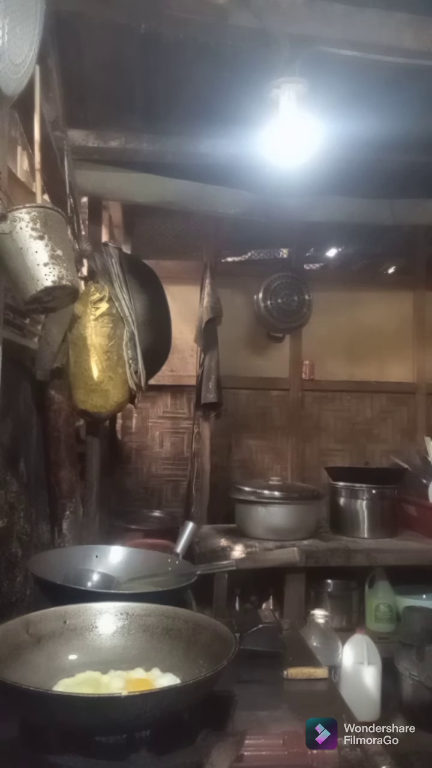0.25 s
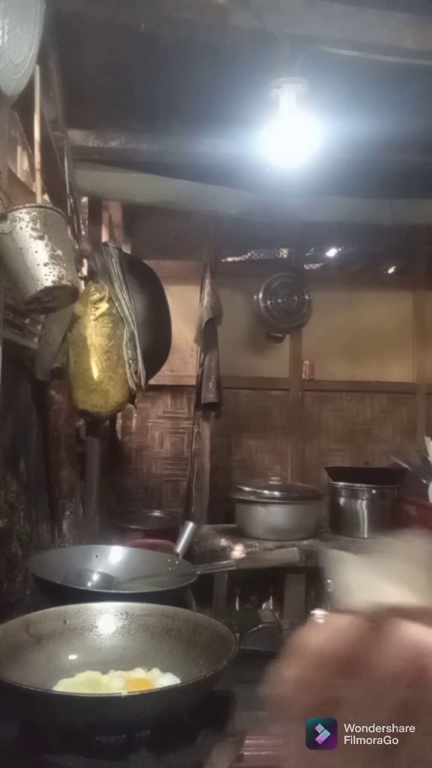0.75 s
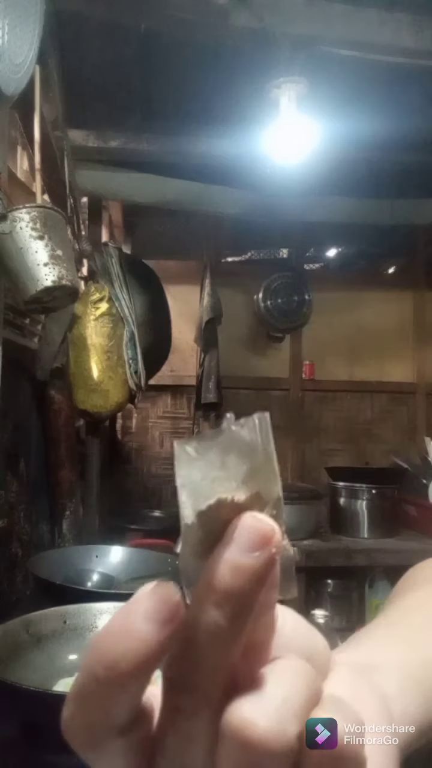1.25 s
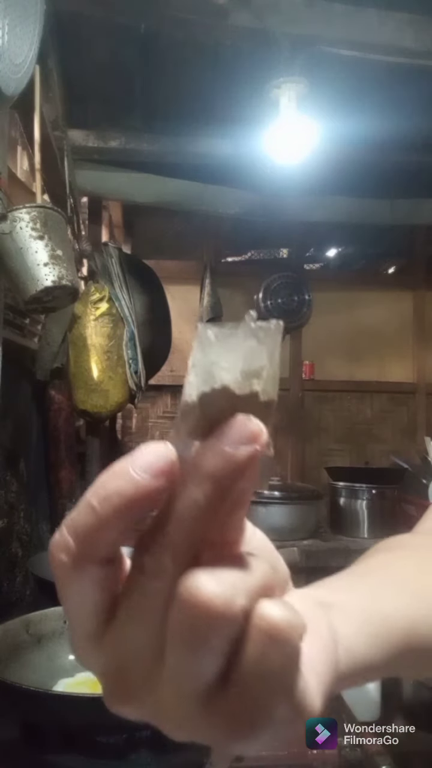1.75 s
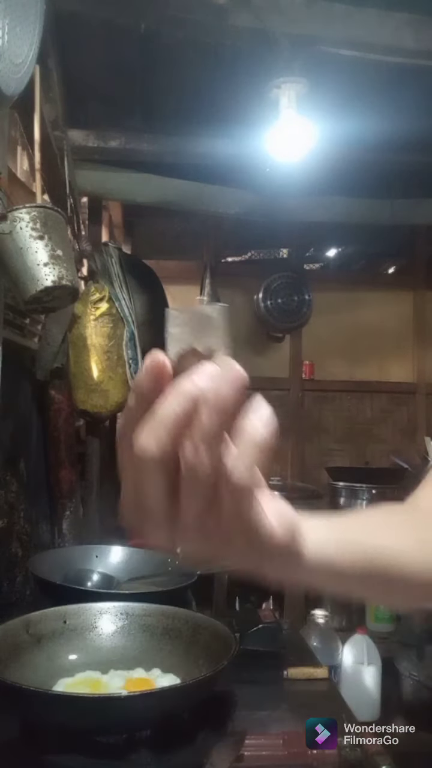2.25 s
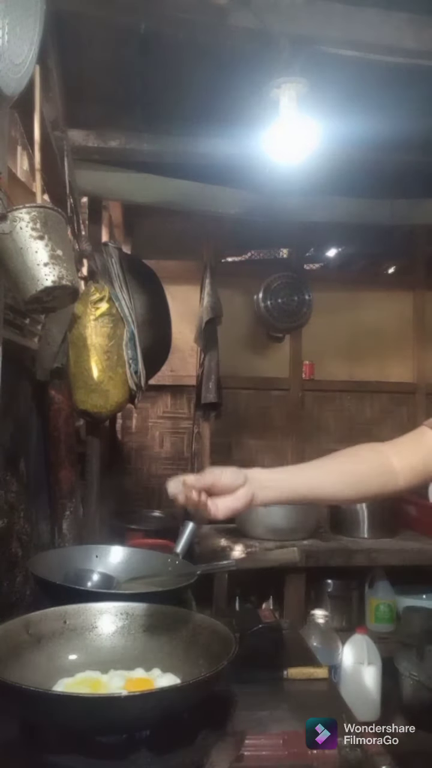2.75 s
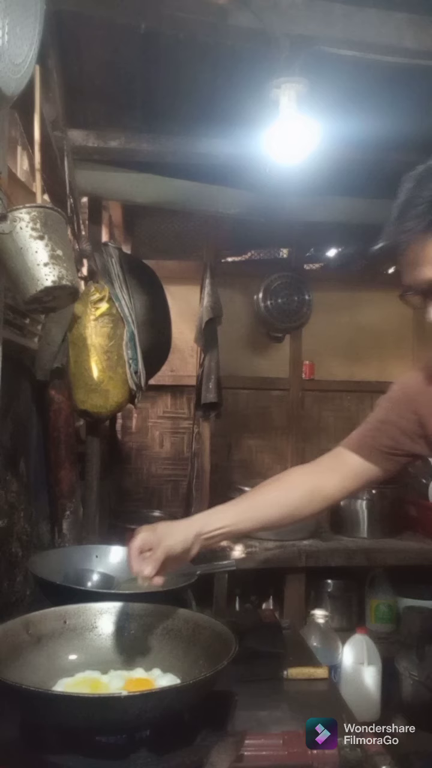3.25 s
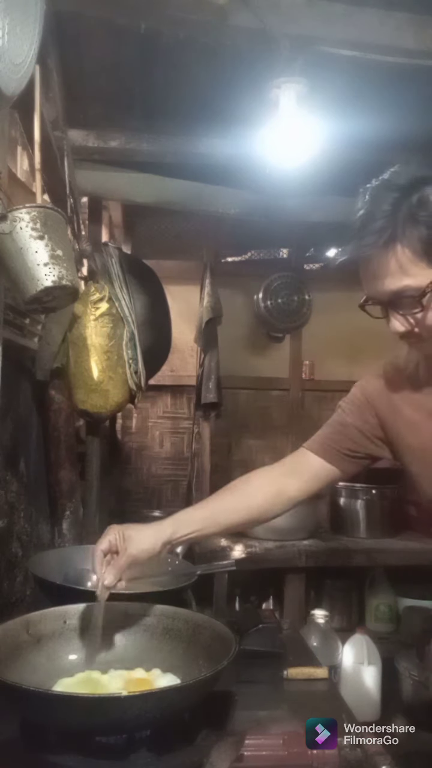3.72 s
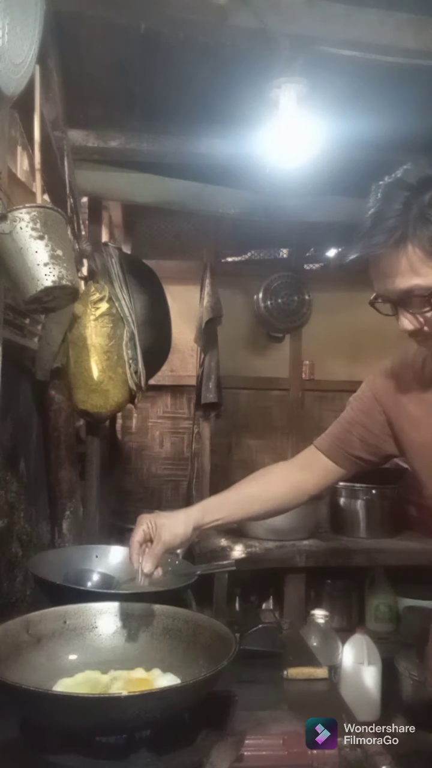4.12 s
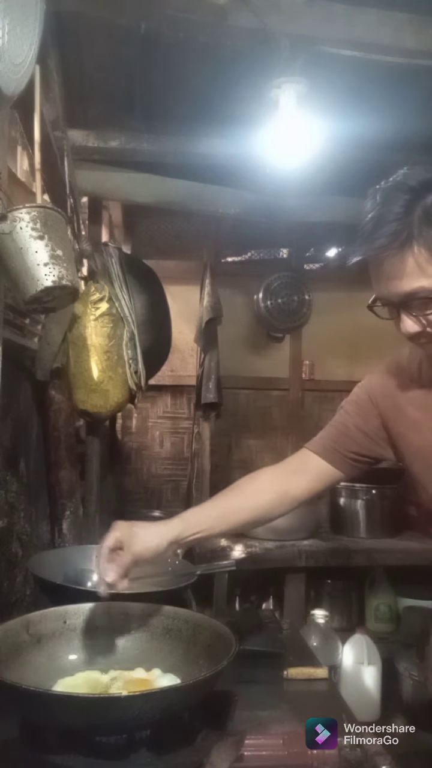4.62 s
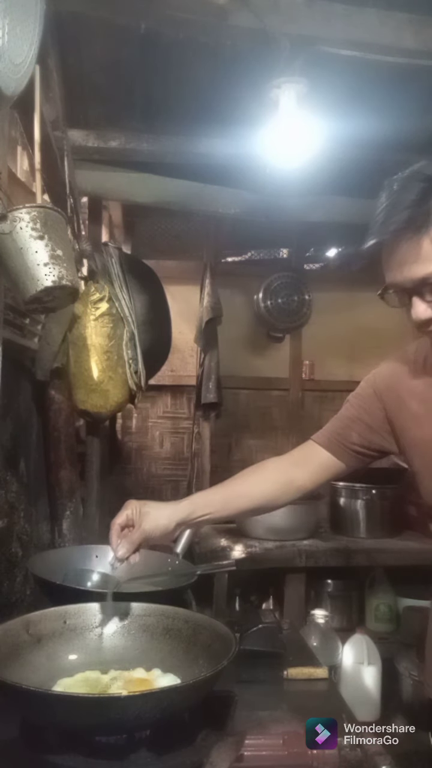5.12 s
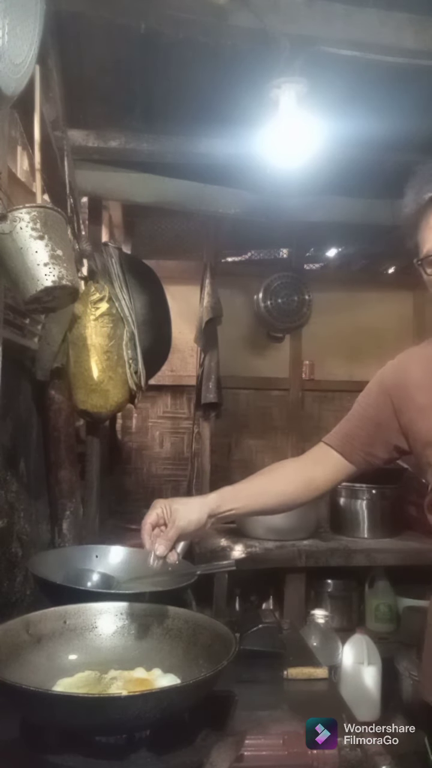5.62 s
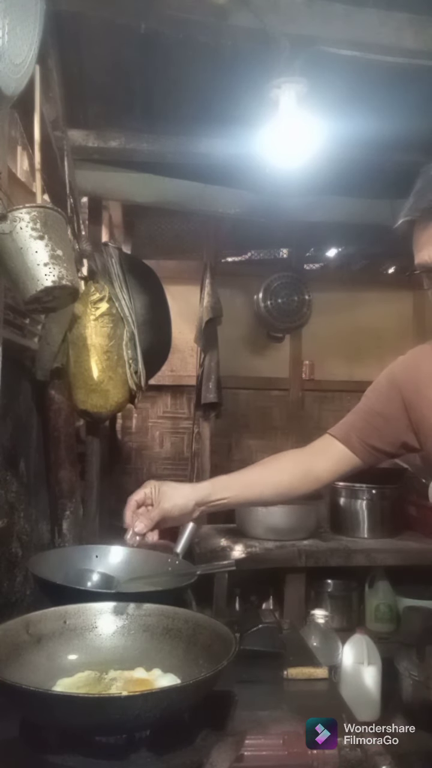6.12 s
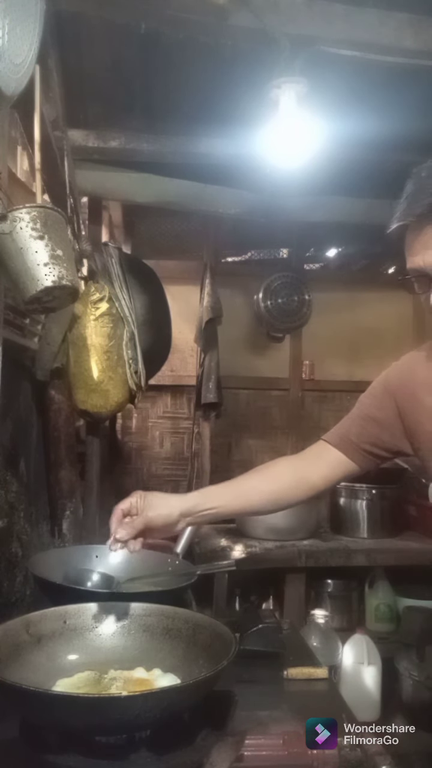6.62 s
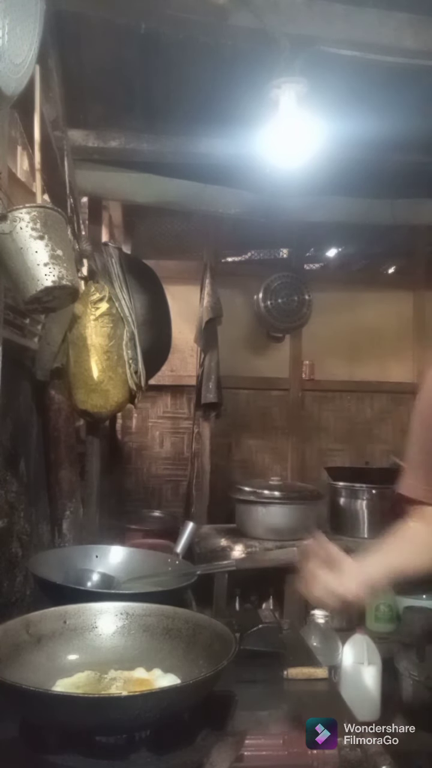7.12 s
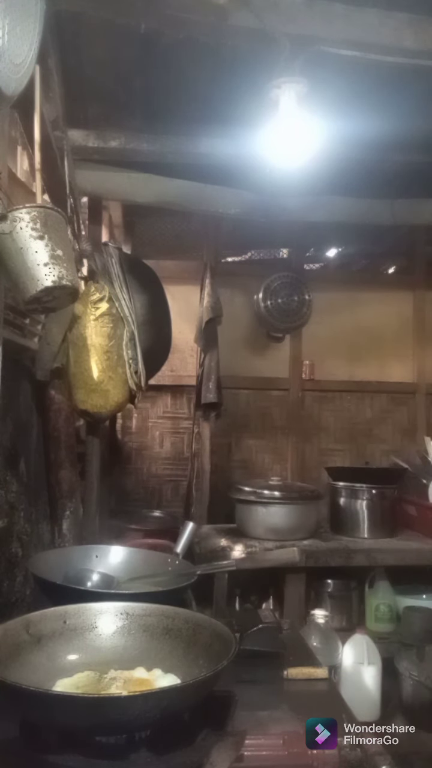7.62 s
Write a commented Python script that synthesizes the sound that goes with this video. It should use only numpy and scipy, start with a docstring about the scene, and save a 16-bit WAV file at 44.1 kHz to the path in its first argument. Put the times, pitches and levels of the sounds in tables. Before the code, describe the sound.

Steady frying with crackling bubbles, one sharp oil spit, soft rustles and knocks, over the low boom of a motorbike and passing vehicle outdoors.

```python
"""Eggs frying beside a street

Eggs fry in a steel wok: random clicks make the sizzle, short ringing noise bands the bubbles and a loud spit of oil.
A pinch of seasoning lifts the fine spray. A sleeve rustles with friction grains and hollow knocks ring.
Outside, a single-cylinder motorbike pulls three times and coasts in between, its boom muffled by the wall.
A second vehicle passes at a steady speed with Doppler shift, over coloured noise and faint falling whines.
"""
import sys
import numpy as np
from scipy import signal
from scipy.fft import rfft, irfft
from scipy.io import wavfile
from scipy.ndimage import uniform_filter1d

SR = 44100
rng = np.random.default_rng(int(sys.argv[2]) if len(sys.argv) > 2 else 0)


def materialize(psi):
    """Save the field psi as 16-bit PCM at rate SR to the path in sys.argv[1].

    A 1-D psi becomes a single channel; in a 2-D psi each row is a channel.
    """
    bounded = np.clip(np.atleast_2d(psi).T, -1, 1)
    quanta = np.round(bounded * 32767).astype(np.int16)
    wavfile.write(sys.argv[1], SR, quanta)


N = 347067
T = np.arange(N) / SR  # time [s]

# modes of the steel wok: (frequency [Hz], bandwidth [Hz], relative gain [dB])
WOK_MODES = [(805, 20, -7), (901, 20, -2), (955, 25, -3), (1199, 40, -4), (1414, 30, -6), (1576, 22, 0),
             (1695, 30, -7), (1954, 30, -4), (2065, 24, -2), (2210, 40, -9), (2448, 16, -3), (2583, 30, -6),
             (2690, 30, -9), (2805, 16, -5), (3227, 25, -2), (3363, 40, -10), (3850, 50, -11),
             (4000, 30, -3), (4163, 30, -1.5), (4400, 45, -10), (4980, 35, -8), (5152, 35, -7),
             (5480, 35, -8), (6120, 35, -6)]
# reverberation of the kitchen: (frequency [Hz], time to fall 60 dB [s])
KITCHEN_T60 = [(300, 0.8), (1500, 0.11), (4000, 0.21), (10000, 0.23)]


def gain_of(db):
    """Decibels to amplitude ratio."""
    return 10 ** (np.asarray(db) / 20)


def unit_rms(x):
    """Normalises the mean power to 1."""
    return x / np.sqrt(np.mean(x ** 2) + 1e-20)


def spectrum_at(points, hz):
    """Spectral interpolation: straight lines over log frequency."""
    f, value = np.transpose(points)
    return np.interp(np.log(hz + 1), np.log(f + 1), value)


def follow(rows, t):
    """Linear interpolation in time: the columns of a curve table at the times t."""
    s, *columns = np.transpose(rows)
    return [np.interp(t, s, c) for c in columns]


def add(mix, s, sound):
    """Superposition: adds a sound to the mix from time s, cut off at the end of the mix."""
    part = mix[max(round(s * SR), 0):][:len(sound)]
    part += sound[:len(part)]


def colour(x, points):
    """Zero-phase spectral shaping: filters x by the curve of the points, to rms 1."""
    gain = gain_of(spectrum_at(points, np.fft.rfftfreq(N, 1 / SR)))
    return unit_rms(irfft(rfft(x) * gain, N))


def wander(rate_hz, size=64):
    """Slow random fluctuation: low-passed noise of rms 1, computed at every size-th sample."""
    t = T[::size]
    lowpass = signal.butter(3, min(rate_hz, 200), fs=SR / size, output="sos")
    smooth = signal.sosfilt(lowpass, rng.standard_normal(2 * len(t)))
    settled = smooth[len(t):]
    return np.interp(T, t, unit_rms(settled))


def swell(peak_s, rise_s, fall_s):
    """Gaussian envelope: a smooth rise to 1 and a smooth fall."""
    return np.exp(-((T - peak_s) / np.where(T < peak_s, rise_s, fall_s)) ** 2)


def held(from_s, to_s, attack_s, release_s):
    """Trapezoidal envelope: linear attack, hold at 1, linear release after to_s."""
    attack = (T - from_s) / attack_s
    release = 1 - (T - to_s) / release_s
    return np.clip(np.minimum(attack, release), 0, 1)


def ring(x, modes, ring_db):
    """Modal resonance: parallel resonators driven by x sound along with it."""
    out = x
    for hz, width, db in modes:
        mode = signal.iirpeak(hz, hz / width, SR)
        out = out + gain_of(db + ring_db) * signal.lfilter(*mode, x)
    return out


def crackle(per_s, spread_db):
    """Random impulse train: exponential dB offsets make a few clicks louder (spread > 0) or softer (< 0)."""
    size = gain_of(spread_db * np.minimum(rng.exponential(1, N), 5))
    return rng.choice([-1, 1], N) * size * (rng.random(N) < per_s / SR)


def burst(hz, octaves, decay_s, room_db, snap=5, size=8192):
    """Impulsive excitation of a minimum-phase band, then reverberant decay.

    The direct part has the energy of 20 ms at rms 1; so has the tail before room_db."""
    t, f = T[:size], np.maximum(abs(np.fft.fftfreq(size, 1 / SR)), 1)
    log_gain = -np.minimum((np.log2(f / hz) / max(octaves, .05)) ** 2 / 4, 8)
    # the Hilbert transform of the log gain gives the minimum phase
    band = np.exp(np.conj(signal.hilbert(log_gain)))[:size // 2 + 1]
    puff, echoes = rng.standard_normal((2, size))
    puff = puff * np.exp(-t / decay_s) + snap * (t == 0)
    echoes = echoes * gain_of(-60 * t / spectrum_at(KITCHEN_T60, hz)) * (t > .003)
    direct = unit_rms(irfft(rfft(puff) * band))
    tail = unit_rms(irfft(rfft(echoes) * band))
    return (direct + gain_of(room_db) * tail) * np.sqrt(.02 * SR / size)


def bursts(rows, decay_s, room_db):
    """Superposition of bursts, one for each row (time [s], level [dB], centre [Hz], spread [octaves])."""
    out = np.zeros(N)
    for s, db, hz, octaves in rows:
        add(out, s, gain_of(db) * burst(hz, octaves, decay_s, room_db))
    return out


def sizzle():
    """Shot noise: thousands of tiny steam bubbles a second, and a finer spray that grows under the seasoning."""
    # strength of the frying before the wok rings: (time [s], level [dB])
    frying_level = [(0, -46.5), (1.5, -50), (2.3, -47.5), (4.1, -46), (5.5, -45), (6.2, -50), (6.65, -46.5),
                    (7.87, -48.5)]
    # spectrum of the bubbles: (frequency [Hz], relative level per Hz [dB])
    body_spectrum = [(600, -27.5), (1000, 2), (1200, 2.5), (1500, -1), (2000, -1), (2800, -1), (3300, -2.5),
                     (4300, -10.5), (5300, -16.5), (6800, -20), (8500, -42.5), (10000, -40.5), (15500, -51)]
    # spectrum of the spray: (frequency [Hz], relative level per Hz [dB])
    spray_spectrum = [(3000, -15), (5500, -8), (7500, -5.5), (8500, 2.5), (9300, -10.5), (10300, -19),
                      (12500, -30.5), (15500, -24)]
    spray_db, seasoning_lift_db = -71, 6.5
    seasoning = held(from_s=4.67, to_s=5.55, attack_s=0.28, release_s=0.28)
    body_db = follow(frying_level, T)[0] + .5 * wander(rate_hz=6.5)
    body = colour(crackle(per_s=6000, spread_db=-1.5), body_spectrum) * gain_of(body_db)
    spray_db = spray_db + seasoning_lift_db * seasoning + 0.91 * wander(rate_hz=36)
    spray = colour(crackle(per_s=6700, spread_db=1.0), spray_spectrum) * gain_of(spray_db)
    return body + spray


def small_bubbles(count=280):
    """Bubble resonance: faint pitched ticks, higher and softer the smaller the bubble, a few of them stronger."""
    lowest_hz, range_octaves, spread_octaves = 2130, 1.9, .11
    lowest_db, db_per_octave, luck_db = -53, -7.3, 3.5
    when, pitch, luck, width = rng.random((count, 4)).T
    octave = range_octaves * pitch ** 0.626
    db = lowest_db + db_per_octave * octave + luck_db * luck ** 3
    rows = zip(when * N / SR, db, lowest_hz * 2 ** octave, spread_octaves * (.5 + width))
    return bursts(rows, decay_s=0.003, room_db=1.5)


def big_bubbles():
    """Impulsive radiation: each of the biggest bubbles bursts with a short band of noise."""
    # before the wok rings: (time [s], level [dB], centre [Hz], spread [octaves])
    pops = [(0.029, -52, 5070, 0.19), (0.153, -42.5, 2680, 0.21), (0.18, -49, 4150, .05),
            (0.27, -45.5, 2020, .2), (0.332, -56, 6000, 0.19), (0.349, -47, 2630, 0.2),
            (0.37, -47, 5660, 0.12), (0.41, -51.5, 3080, 0.06), (0.505, -59, 6200, 0.11),
            (0.523, -46, 2670, 0.17), (0.537, -52, 4960, .08), (0.676, -50, 5160, .09),
            (1.101, -47, 4100, .07), (1.154, -49, 2160, .12), (1.204, -62, 7750, 0.12),
            (1.293, -48.5, 4570, 0.13), (1.355, -58, 5200, .07), (1.418, -61, 6200, 0.097),
            (1.431, -48.5, 3280, 0.18), (1.455, -56, 5900, 0.11), (1.509, -60, 7400, 0.12),
            (1.538, -55, 5200, 0.064), (1.682, -50, 2780, .15), (1.686, -56.5, 5160, 0.15),
            (1.805, -58, 3520, 0.055), (1.908, -55.5, 6700, .075), (2.061, -61, 6740, 0.087),
            (2.081, -56, 5770, .08), (2.153, -45, 2850, 0.46), (2.186, -46.5, 3040, 0.16),
            (2.225, -52, 4030, 0.089), (2.316, -47, 3150, 0.4), (2.645, -60, 5200, .08),
            (2.677, -56, 4500, .08), (2.893, -46.5, 4720, 0.1), (3.205, -45, 3100, .12),
            (3.323, -53, 5770, 0.13), (3.367, -56, 5460, .1), (3.494, -61, 6250, .09),
            (3.544, -57, 4860, .08), (3.599, -62, 8600, .08), (3.788, -57, 6500, .075),
            (3.815, -52, 3800, 0.052), (3.817, -59, 6750, .07), (3.844, -51, 3870, 0.088),
            (3.944, -56, 5430, .07), (4.034, -49, 5150, .15), (4.062, -42, 2680, 0.23),
            (4.083, -49.5, 4600, .15), (4.144, -55, 5570, .11), (4.222, -73, 12500, .25),
            (4.268, -48.5, 5030, 0.11), (4.327, -42, 3060, 0.11), (4.38, -62, 6150, .08),
            (4.574, -43, 2280, 0.31), (4.724, -39.5, 2640, 0.12), (4.864, -55, 5340, .08),
            (4.907, -44.5, 4000, 0.1), (5.24, -62, 7500, 0.082), (5.342, -46.5, 2470, 0.038),
            (5.565, -53, 6900, 0.14), (5.665, -52.5, 4100, 0.11), (5.707, -52.5, 5250, 0.06),
            (5.756, -49.5, 3980, 0.11), (5.799, -45.5, 2040, 0.22), (5.938, -60, 6950, .12),
            (5.95, -48.5, 3160, 0.15), (5.991, -55.5, 6360, 0.11), (6.181, -53, 3400, .08),
            (6.36, -47, 3000, 0.1), (6.382, -60.5, 6100, .08), (6.469, -59, 5370, 0.061),
            (6.497, -59, 7150, 0.1), (6.512, -62, 8300, .08), (6.581, -55.5, 5600, .17),
            (6.642, -46.5, 3450, .09), (6.644, -53, 4860, 0.09), (6.673, -49, 4700, 0.15),
            (6.803, -40, 3270, .095), (6.831, -50, 4440, 0.21), (6.873, -60, 6200, 0.091),
            (6.978, -58, 4930, .09), (7.001, -55, 4930, .07), (7.178, -57, 6370, .13),
            (7.181, -40, 2150, 0.29), (7.218, -60, 6100, 0.072), (7.282, -58, 5900, 0.076),
            (7.409, -46, 2570, 0.4), (7.552, -62.5, 8250, .07), (7.659, -56.5, 6000, 0.093),
            (7.677, -64, 8350, 0.086), (7.803, -64, 6500, .08)]
    return bursts(pops, decay_s=.003, room_db=1)


def exhaust_pipe(times, strength, hz, width):
    """Resonator response: each firing swells and dies in a pipe resonance, levelled to a steady 1."""
    out, t = np.zeros(N), T[:SR // 5]
    for s, size, f, w in np.broadcast(times, strength, hz, width):
        u = np.pi * w * t
        peak_s = 3 / (np.pi * w)  # where u ** 3 * exp(-u) is largest
        add(out, s, size * u ** 3 * np.exp(-u) * np.cos(2 * np.pi * f * (t - peak_s)))
    power = uniform_filter1d(uniform_filter1d(out ** 2, size=6000), size=4000)
    return out / np.sqrt(abs(power) + 1e-9)


def overtones(rate, turns, count=20):
    """Harmonic series: multiples of the firing rate glide through the fixed colour of pipe and wall."""
    # (frequency [Hz], relative level [dB])
    overtone_colour = [(170, -25), (215, -9), (250, 0), (285, 0), (320, -7), (350, -7), (380, -12),
                       (430, -20), (560, -19), (700, -28)]
    lines = np.zeros(N)
    for k in range(6, count):
        # each overtone swells and fades by itself
        db = spectrum_at(overtone_colour, k * rate) + 2.5 * wander(rate_hz=2)
        lines += gain_of(db) * np.sin(2 * np.pi * (k * turns + rng.random()))
    return unit_rms(lines)


def motorbike():
    """Pulse-excited resonance: each firing rings the silencer and the pipe.

    An open throttle makes the note higher and purer and brings out overtones; slowing makes the firing stumble."""
    # engine speed: (time [s], firing rate [1/s])
    firing_rate = [(0, 35), (1.05, 43.6), (1.2, 41.5), (1.5, 34.3), (1.7, 31.3), (2.6, 27.2), (3, 26),
                   (3.9, 26), (4.6, 26.6), (5, 28.6), (5.3, 30.2), (5.67, 32.1), (5.95, 23.5), (6.3, 19.5),
                   (6.47, 25), (6.62, 23), (6.9, 22.4), (7.87, 23.3)]
    # exhaust boom before wall and kitchen: (time [s], level [dB])
    boom_level = [(0, -34), (1.9, -34), (2.55, -30), (3.6, -45.5), (4.35, -33), (4.85, -31), (5.22, -21.5),
                  (5.6, -20.5), (5.72, -32), (6.27, -30), (6.75, -25), (7.2, -30), (7.7, -19.5),
                  (7.87, -19.5)]
    # the rider opens the throttle: (from [s], to [s], opening [0-1])
    pulls = [(0.0, 1.05, 0.48), (3.933, 5.623, 0.96), (6.14, 8.0, 0.83)]
    # rushing gas: (frequency [Hz], relative level per Hz [dB])
    rasp_spectrum = [(200, -11), (330, 0.5), (400, -4), (560, 3.5), (850, -2.5), (2000, -49.5)]
    open_s, shut_s = 0.348, 0.17
    pipe_hz, pull_rise_hz = 108.3, 34.6  # off the throttle; rise with the hotter gas of full throttle
    rise_at_rate, rise_speed_power = 25.6, 1.68  # the rise grows with speed from this firing rate [1/s]
    coast_width_hz, pull_width_hz = 70, 44  # at shut and full throttle
    steady_uneven, overrun_uneven = .045, .22  # unevenness of the firing [0-1]
    overrun_slowing = 25  # loss of firing rate at full overrun unevenness [1/s each second]
    thud_db = -11.5  # low beat of the silencer against the boom, throttle shut
    coast_overtone_db, pull_overtone_db = -51, -37
    rasp_db = -49  # at full throttle, at the instant of firing

    rate = follow(firing_rate, T)[0]
    boom_db = follow(boom_level, T)[0]
    throttle = sum(opening * held(start, end, open_s, shut_s) for start, end, opening in pulls)
    turns = np.cumsum(rate) / SR  # one turn for each firing
    firings = np.flatnonzero(np.diff(np.floor(turns)))

    pull = throttle[firings]
    climb = (rate[firings] / rise_at_rate) ** rise_speed_power
    width = np.interp(pull ** 3, [0, 1], [coast_width_hz, pull_width_hz])
    slowing = -np.gradient(rate)[firings] * SR
    uneven = np.interp(slowing, [0, overrun_slowing], [steady_uneven, overrun_uneven])
    late, strong, detune = rng.standard_normal((len(firings), 3)).T
    times = T[firings] + .003 * uneven * late
    strength = gain_of(10 * uneven * strong)
    hz = (pipe_hz + pull_rise_hz * pull * climb) * (1 + 0.2 * uneven * detune)

    boom = exhaust_pipe(times, strength, hz, width) * gain_of(boom_db)
    thud = exhaust_pipe(times, strength, hz=88, width=34)
    thud = thud * gain_of(boom_db + thud_db) * (1 - throttle ** 7)
    upper_db = np.interp(throttle, [0, 1], [coast_overtone_db, pull_overtone_db])
    upper = overtones(rate, turns) * gain_of(upper_db)
    rasp = colour(rng.standard_normal(N), rasp_spectrum) * gain_of(rasp_db)
    rasp = rasp * throttle ** 3 * np.exp(-(turns % 1))
    wall = signal.butter(2, [48, 420], "band", fs=SR, output="sos")
    return signal.sosfilt(wall, boom + thud) + upper + rasp


def passing_vehicle():
    """Doppler shift and spherical spreading: a steady engine and its tyres, louder near, lower when leaving."""
    # engine harmonics: (multiple of the firing rate, relative level [dB])
    drone_orders = [(2, -8), (3, -4), (4, -1), (5, .5), (6, -8), (7, -11), (8, -15)]
    # tyre noise: (frequency [Hz], relative level per Hz [dB])
    tyre_spectrum = [(150, -12.5), (300, 4), (450, -3), (750, -0.5), (1100, -5), (1500, -5), (2200, -10),
                     (5000, -57)]
    nearest_s, distance_m, speed_m_per_s = 3.5, 15, 7.5  # time and distance of the nearest point
    firing_rate = 34.1  # at the engine [1/s]
    drone_db, tyres_db = -31.5, -43  # at the nearest point, before the kitchen rings
    metres = np.hypot(distance_m, speed_m_per_s * (T - nearest_s))
    turns = firing_rate * (T - metres / 343) + .035 * wander(rate_hz=1.5)  # delayed by the speed of sound
    drone = np.zeros(N)
    for k, db in drone_orders:
        drone += gain_of(db + 3 * wander(rate_hz=2)) * np.sin(2 * np.pi * (k * turns + rng.random()))
    tyres = colour(rng.standard_normal(N), tyre_spectrum)
    return (gain_of(drone_db) * unit_rms(drone) + gain_of(tyres_db) * tyres) * distance_m / metres


def patchy(x, depth_db, size=8192):
    """Time-frequency modulation: random patches, some 20 Hz by a fifth of a second, lift and sink x."""
    hop = size // 4
    z = signal.stft(x, nperseg=size, noverlap=size - hop)[2]
    patches = uniform_filter1d(rng.standard_normal(z.shape), size=4, axis=0)
    patches = uniform_filter1d(patches, size=4, axis=1)
    z = z * gain_of(depth_db * unit_rms(patches))
    return unit_rms(signal.istft(z, nperseg=size, noverlap=size - hop)[1][:N])


def street():
    """Broadband noise and gliding tones: patchy low rumble, a steady wash of road noise, faint falling whines."""
    # low rumble: (frequency [Hz], relative level per Hz [dB])
    rumble_spectrum = [(15, -27.5), (38, -19.5), (50, -13), (65, -7), (120, 1), (200, -4.5), (330, -23.5),
                       (600, -68)]
    # road noise: (frequency [Hz], relative level per Hz [dB])
    wash_spectrum = [(150, -9), (300, 9.5), (450, -0.5), (700, 5), (1000, -12), (1400, -14), (2200, -11),
                     (5000, -59.5)]
    # before the kitchen rings: (peak time [s], swell [s], pitch at the peak [Hz], fall [Hz/s], level [dB])
    falling_whines = [(2.1, .05, 1175, 400, -46), (2.25, .08, 697, 170, -42)]
    rumble = gain_of(-36) * patchy(colour(rng.standard_normal(N), rumble_spectrum), depth_db=2.5)
    wash = gain_of(-47) * colour(rng.standard_normal(N), wash_spectrum)
    whines = np.zeros(N)
    for s, swell_s, hz, fall, db in falling_whines:
        cycles = np.cumsum(hz - fall * (T - s)) / SR
        whines += gain_of(db) * swell(s, swell_s, swell_s) * np.sin(2 * np.pi * cycles)
    return rumble + wash + whines


def rustle():
    """Friction noise: dense soft grains, close by, swell with each swing of the arm."""
    # sleeve and sachet: (peak time [s], rise [s], fall [s], level before the flutter [dB])
    arm_swings = [(0.79, 0.14, 0.21, -37.5), (0.77, 0.0082, 0.12, -55), (0.955, .008, 0.067, -50),
                  (2.49, 0.042, 0.11, -42), (2.81, 0.031, 0.038, -41), (7.01, 0.026, 0.045, -45.5)]
    # (frequency [Hz], relative level per Hz [dB])
    cloth_spectrum = [(150, -11), (350, 2), (550, -4.5), (900, -4.5), (1300, 0), (2200, 3), (3300, 3),
                      (5000, -9.5), (8500, -25), (10500, -38.5), (15500, -38)]
    swings = sum(gain_of(db) * swell(s, rise_s, fall_s) for s, rise_s, fall_s, db in arm_swings)
    flutter = gain_of(.8 * wander(rate_hz=22))
    return colour(crackle(per_s=3000, spread_db=2.6), cloth_spectrum) * swings * flutter


def firm_band(hz, octaves, size):
    """Envelope compression: a band of noise, octaves to either side of hz, with its dips filled in, rms 1."""
    edges = [hz / 2 ** octaves, hz * 2 ** octaves]
    bandpass = signal.butter(3, edges, "band", fs=SR, output="sos")
    band = signal.hilbert(signal.sosfilt(bandpass, rng.standard_normal(size)))
    return unit_rms(band.real / abs(band) ** .7)


def knocks(size=8192):
    """Modal excitation: soft pushes, each with a weaker scuff, ring a hollow body and the kitchen."""
    # before ringing: (peak time [s], swell [s], level [dB], centre [Hz], half-width [octaves])
    pushes = [(0.775, .03, -46, 900, .5), (0.965, .016, -43, 527, .35), (2.463, .025, -40.5, 1080, .48),
              (2.54, .024, -41, 900, .38), (5.965, .018, -45, 800, .38), (6.9, .017, -38, 820, .28),
              (6.961, .015, -31.5, 840, .27), (7.007, .012, -34, 690, .18), (7.027, .015, -34.5, 860, .45)]
    # modes of the knocked thing: (frequency [Hz], bandwidth [Hz], relative gain [dB])
    hollow_modes = [(646, 35, -1), (735, 50, -7), (805, 25, -3), (900, 25, -1), (955, 25, -2),
                    (1197, 40, 3), (1690, 52, 1), (2440, 130, 0)]
    scuff_db, room_db = -12.5, -8.5  # against the push
    out, t = np.zeros(N), T[:size]
    for s, swell_s, db, hz, octaves in pushes:
        scuff = firm_band(hz=1510, octaves=0.33, size=size)
        push = firm_band(hz, octaves, size) + gain_of(scuff_db) * scuff
        push = push * gain_of(db) * np.exp(-((t - t.mean()) / swell_s) ** 2)
        echoes = rng.standard_normal(size) * gain_of(-60 * t / spectrum_at(KITCHEN_T60, hz))
        tail = signal.fftconvolve(push, echoes / np.linalg.norm(echoes))
        add(out, s - t.mean(), push)
        add(out, s - t.mean(), gain_of(room_db) * tail)
    return ring(out, hollow_modes, ring_db=5.5)


def spit():
    """Impact excitation: a quick volley of droplets rings the wok, with a rattling mist behind it."""
    # droplets before the wok rings: (time [s], level [dB], centre [Hz], spread [octaves])
    volley = [(5.433, -35, 2050, 0.42), (5.441, -30.5, 1820, 0.36), (5.449, -30, 1800, 0.25),
              (5.452, -34.5, 2870, 0.28), (5.461, -33, 3120, .34), (5.472, -39, 3370, 0.31),
              (5.491, -44, 3700, 0.31)]
    # finest droplets: (frequency [Hz], relative level per Hz [dB])
    mist_spectrum = [(2500, -13), (5000, 1.5), (8500, -8), (11500, -24), (15000, -16)]
    mist = colour(crackle(per_s=3500, spread_db=2.5), mist_spectrum)
    mist = mist * gain_of(-48.5) * swell(volley[4][0], rise_s=0.017, fall_s=0.039)
    droplets = bursts(volley, decay_s=0.008, room_db=-3)
    return ring(droplets, WOK_MODES, ring_db=7) + mist


def scene():
    """Superposition: the wok and the cook close by, the street outside ringing the kitchen."""
    # kitchen and its hanging pots: (frequency [Hz], bandwidth [Hz], relative gain [dB])
    room_modes = [(521, 40, -5), (795, 25, -6), (901, 22, -4), (955, 25, -5), (1199, 40, -4)]
    frying = ring(sizzle() + small_bubbles() + big_bubbles(), WOK_MODES, ring_db=-4.5)
    outside = ring(motorbike() + passing_vehicle() + street(), room_modes, ring_db=0)
    return (frying + spit() + knocks() + rustle() + outside)[None]


def record(dry):
    """Band limitation: a linear-phase low-pass at 15.5 kHz."""
    lowpass = signal.firwin(511, 15500, window=("kaiser", 9), fs=SR)
    return signal.oaconvolve(dry, lowpass[None], "same")


dry = scene()
out = record(dry)
materialize(out)
```